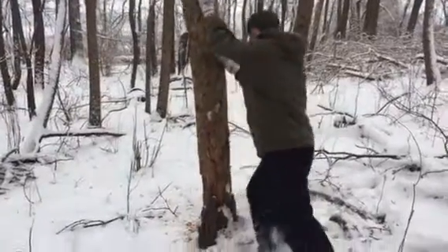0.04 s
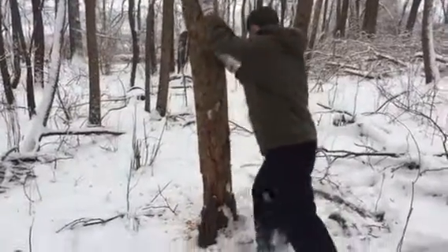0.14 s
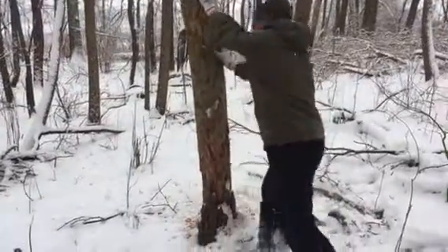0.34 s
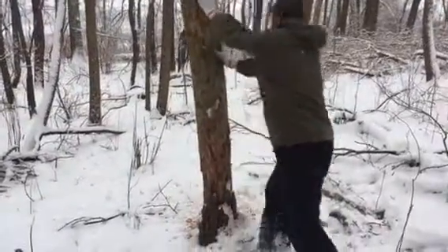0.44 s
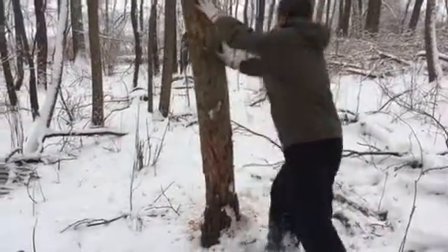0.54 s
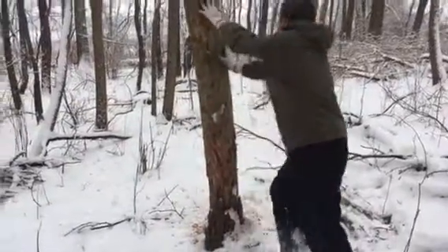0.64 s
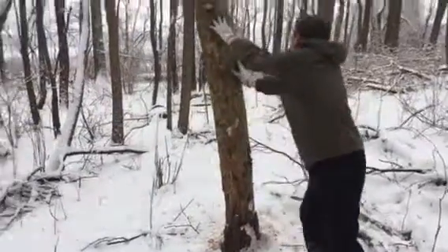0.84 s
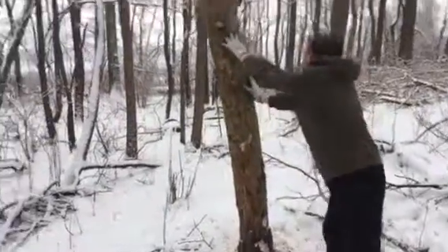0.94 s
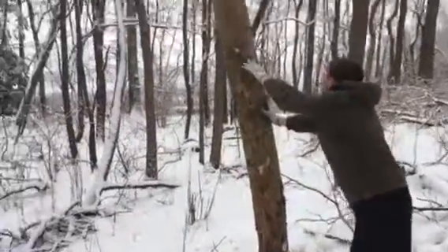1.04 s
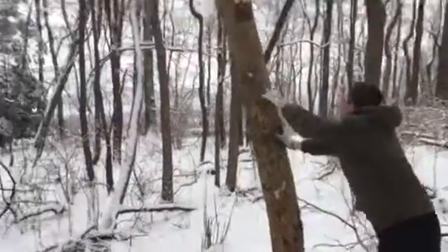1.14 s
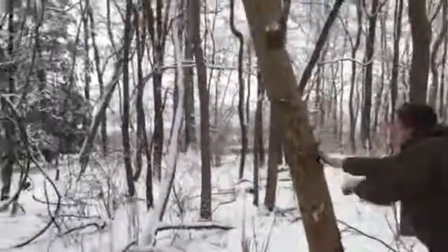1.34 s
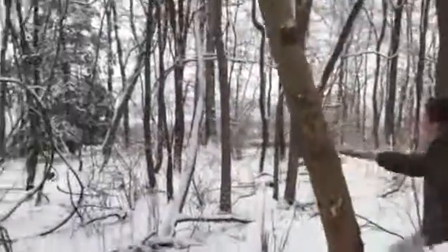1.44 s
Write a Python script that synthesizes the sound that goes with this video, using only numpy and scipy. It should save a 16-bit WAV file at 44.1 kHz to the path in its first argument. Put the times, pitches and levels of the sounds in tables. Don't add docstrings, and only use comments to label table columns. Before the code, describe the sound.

Tree trunk cracking apart in a quiet snowy wood, a few metres away. Faint air and tiny ticks until 0.2 s, then a violent cluster of cracks with a hollow thump to 0.28. A lone snap at 0.45, a second burst at 0.6-0.7, sharp breaks at 0.92-1.0 and 1.08, then smaller crackles and splintering to 1.5, over a faint low groan and short woodland scatter.

```python
import sys
import numpy as np
from scipy import signal
from scipy.fft import rfft, irfft
from scipy.io import wavfile

SR = 44100
rng = np.random.default_rng(int(sys.argv[2]) if len(sys.argv) > 2 else 0)


def amplitude_ratio(level_db):
    exponent = np.asarray(level_db, float) / 20
    return 10 ** exponent


def wav_record(signal):
    frames = np.transpose(np.atleast_2d(signal))
    bounded = np.clip(frames, -1, 1)
    quanta = np.round(bounded * 32767).astype(np.int16)
    wavfile.write(sys.argv[1], SR, quanta)


N = 66150

# hz, density_db_per_hz
FLOOR_COLOUR = [(18, -33), (30, -21), (82, -61), (455, -2), (858, -3.5), (3050, -22), (6720, -46),
                (14500, -54), (16500, -48)]
# time_s, level_db
STUMP_GROAN = [(0, -58), (.2, -63), (.3, -54), (.55, -51.5), (.85, -55.5), (1.1, -55.5), (1.5, -59)]
# time_s, level_db
FIBRE_STRAIN = [(0, -56.5), (.2, -55.5), (.3, -56), (.42, -49.5), (.58, -50), (.72, -43.5), (0.882, -59.5),
                (.98, -62), (1.04, -42.5), (1.12, -44.5), (1.19, -47), (1.242, -41), (1.3, -46), (1.5, -52)]
# hz, density_db_per_hz
SPLINTER_COLOUR = [(180, -12), (300, -4), (1250, -4.5), (2930, -10.5), (4670, -13), (9090, -13),
                   (16000, -19)]
# start_s, level_db, pitch_hz, t60_s
STAVE_RINGS = [(.091, -32.5, 683, .025), (0.09, -35.5, 593, 0.046), (.094, -38.5, 175, .1),
               (0.9, -33, 204, 0.065), (0.23, -20, 332, 0.12), (.2212, -28, 1700, .008),
               (.228, -23, 1040, 0.01), (.2425, -6, 1670, 0.0038), (.2770, -13, 2970, 0.0099),
               (.6045, -22, 720, 0.021), (.6050, -14.5, 1730, 0.012), (.6333, -13.5, 1500, 0.011),
               (.6510, -21.5, 750, 0.019), (.6985, -23.5, 1230, 0.032), (.9158, -7.5, 5340, 0.0033),
               (.9480, -29, 1230, 0.044), (.9930, -13.5, 3540, 0.0043), (.9935, -24, 700, 0.019),
               (1.0800, -15, 1340, 0.035), (1.0805, -18.5, 680, 0.023), (1.0800, -14.5, 6200, 0.0059),
               (1.2960, -26.5, 610, 0.032), (1.2965, -27, 1320, 0.013), (.384, -27.5, 1440, .01)]
# start_s, bending_wave_db, knock_db
TRUNK_THUMPS = [(0.093, -45.5, -53), (.104, -54, -47), (.222, -16, -10), (.230, -55, -10.5),
                (0.24, -24.5, -38), (0.25, -25.5, -18), (0.279, -20, -40), (0.295, -31.5, -33.5),
                (0.454, -48, -33), (0.606, -45.5, -28.5), (0.69, -23, -15.5), (.735, -47, -48),
                (0.902, -37, -68), (0.949, -55, -36), (0.991, -35, -30.5), (1.124, -34.5, -45),
                (1.150, -37.5, -58), (1.222, -47, -44), (1.296, -62, -46.5), (1.351, -47, -44.5),
                (1.40, -44, -42), (1.46, -46, -37.5)]
# pitch_hz, level_db, t60_s
TRUNK_MODES = [(263, -18, 0.066), (284, -2, 0.0377), (328.9, -0.5, 0.067), (561, -7, 0.11),
               (690, -9, 0.079)]
# start_s, woody_db, woody_hz, sharp_db, sharp_hz
FIRST_BREAK = [(0.1711, -50, 2110, -35.5, 6250), (0.1986, -39, 1070, -27.5, 3620),
               (0.2098, -35.5, 1410, -59, 3600), (0.2208, -9.5, 1800, 1, 5950),
               (0.2274, -15.5, 1320, -16, 6000), (0.2312, -14, 530, -34, 2300),
               (0.2421, -7, 1500, -9, 3140), (0.2493, -41, 1340, -5, 2500), (0.251, -15, 565, -10, 2300),
               (0.2768, -12.5, 1310, -1.5, 2970), (0.3675, -39, 2020, -51, 2630),
               (0.3838, -37, 1500, -14.5, 2650), (0.4476, -27, 1800, -4, 3030),
               (0.4602, -34, 2200, -37, 2280)]
# start_s, woody_db, woody_hz, sharp_db, sharp_hz
SECOND_BREAK = [(0.586, -55, 1870, -26, 3814), (0.5962, -38, 1500, -19.5, 5863),
                (0.6042, -43, 1620, 3.5, 6100), (0.6169, -28, 1210, -18, 2360),
                (0.633, -15.5, 1440, -2.5, 2520), (0.6479, -36, 1870, -18, 4260),
                (0.650, -19, 2080, -13, 4630), (0.6722, -34, 1400, -19, 3000),
                (0.6889, -25, 2350, -1.5, 3200), (0.6923, -13.5, 1500, -6, 2970),
                (0.6982, -17.5, 1200, -6.5, 2640), (0.7027, -22, 534, -30, 3170),
                (0.7308, -35, 1160, -16.5, 3720), (0.785, -44, 1920, -22, 2330),
                (0.8285, -31, 1400, -15.5, 3100), (0.8476, -42, 590, -23.5, 3450),
                (0.9156, -16.5, 1430, -10.5, 5460), (0.9337, -58, 1310, -20, 2350),
                (0.9461, -40, 1250, -5, 3720)]
# start_s, woody_db, woody_hz, sharp_db, sharp_hz
GIVING_WAY = [(0.9905, -21, 1470, -13, 2850), (0.993, -17, 1600, 4.5, 2870), (1.006, -33, 1940, -6.5, 2200),
              (1.027, -54, 2140, -18, 2270), (1.054, -51, 1790, -15, 3650), (1.072, -30, 2280, -8.5, 7160),
              (1.0797, -15, 954, -1, 9500), (1.1026, -47, 754, -33, 6740), (1.1118, -37, 1090, -22, 2800),
              (1.121, -43, 583, -18, 5960), (1.1323, -52, 1370, -15, 3800), (1.15, -30, 1140, -14.5, 3800),
              (1.1975, -29.5, 2370, -8.5, 2870), (1.218, -38, 1630, -19, 3640),
              (1.222, -31, 1400, -11, 7000), (1.226, -26, 1580, -12.5, 2900),
              (1.244, -51, 1400, -15.5, 3100), (1.2498, -51, 1430, -17, 3700),
              (1.2566, -30.5, 1390, -12, 4230),
              (1.279, -41, 1420, -12.5, 3520), (1.2942, -28.5, 2150, -6, 5270),
              (1.3003, -31, 1400, -19, 3840), (1.3282, -30, 1440, -31, 3040),
              (1.3391, -37, 1400, -20.5, 2630), (1.3564, -40, 1480, -24, 9600),
              (1.3937, -35.5, 1420, -23, 6100), (1.3977, -39, 2000, -17.5, 3750),
              (1.4009, -45, 690, -15, 7000), (1.4347, -37, 1280, -42, 7000),
              (1.4596, -38, 1500, -12.5, 3380), (1.4628, -30.5, 1440, -15, 2770),
              (1.47, -38, 2140, -13, 3180), (1.4894, -43, 1370, -28, 2970)]
# start_s, peak_db, fall_ms
FRAYED_FIBRES = [(0.2212, -4.5, 2), (.2275, -3.5, 1.8), (.2420, -2.5, 1.5), (.2492, -3.5, 2.1),
                 (.2762, -4.5, 1.1), (.3055, -23, 1.8), (.3200, -28, 2.2), (.4075, -32, 1.6),
                 (.6040, -1.5, 2.35), (.6120, -25, 1.7), (.6180, -21, 1.4), (0.621, -22, 1.2),
                 (0.648, -18, 1.9), (.6500, -5.5, 1.34), (0.679, -23.5, 3.6), (0.6979, -1.5, 1.7),
                 (0.7587, -40, 1.8), (.7850, -19.5, 0.92), (0.8607, -33, 1.6), (.8747, -34, 1.5),
                 (.9460, -9.5, 1.4), (0.9562, -20, 1.4), (0.975, -32, 1), (.9835, -36, 1.2),
                 (1.0050, -23, 30), (1.0725, -19, 1.3), (1.0801, -28, 1.2), (1.102, -24, 2.4),
                 (1.1365, -26, 2.2), (1.1497, -18, 2.4), (1.2855, -24, 1.5), (1.2900, -17, 1.3),
                 (1.2937, -8, 2.9), (1.3, -15.5, 2.1), (1.3200, -31, 1.5), (1.3263, -23, 1.5),
                 (1.3385, -23, 2.1), (1.3555, -21, 0.73), (1.3643, -34, 1.6), (1.3716, -25.5, 2.2),
                 (1.408, -25, 1.6), (1.4146, -32, 1.3), (1.432, -21, 2.5), (1.4436, -29, 0.94),
                 (1.479, -30, 1.8)]
# start_s, length_s, level_db, dulled_above_hz
RAGGED_TEARS = [
    (0.2227, 0.011, -12, 2160),
    (0.239, 0.019, -20.5, 3640),
    (0.689, 0.014, -21, 4050),
    (0.989, 0.011, -27.5, 5960),
]
# hz, level_db, t60_s
TREE_SCATTER = [(151, -11, 0.22), (457, -15.5, 0.24), (1400, -29, 0.71), (2980, -31.5, 0.9),
                (7000, -30.5, 0.47), (13000, -19.5, 0.086)]

FLOOR_DB = -58
SPLINTERS_PER_S, SPLINTER_SPREAD_DB, SPLINTER_DB, HISS_DB = 900, 4.0, -1, -2
BEND_LAG_S, BEND_LAW = .012, .8
BEND_LOW_HZ, BEND_HIGH_HZ = 70, 250
RISE_S, SNAP_FALL_S = .0002, .0007
WOODY_CYCLES, SHARP_CYCLES = 9.0, 12.0
BROAD_DB, BRIGHT_DB = -1, 9
CLICK = 2.5
FRAY_DB, FRAY_LOW_HZ, FRAY_HIGH_HZ = -4.5, 1500, 11100
GROUND_LAG_S, GROUND_DB, GROUND_CUT_HZ = .0026, -12.5, 5400
DIP_HZ, DIP_SHARE = 420, .5
CUTOFF_HZ = 16970


def at_hz(points, hz, column=1):
    p = np.array(points)
    return np.interp(np.log(hz), np.log(p[:, 0]), p[:, column])


def level_over_time(points):
    s, db = np.transpose(points)
    return amplitude_ratio(np.interp(np.arange(N) / SR, s, db))


def rms_one(x):
    return x / np.sqrt(np.mean(x ** 2) + 1e-20)


def peak_one(x):
    return x / (np.abs(x).max() + 1e-12)


def cut(x, hz, kind):
    return signal.sosfilt(signal.butter(2, hz, kind, fs=SR, output="sos"), x)


def colour(x, spectrum):
    hz = np.maximum(np.arange(len(x) // 2 + 1) * SR / len(x), 1)
    return rms_one(irfft(rfft(x) * amplitude_ratio(at_hz(spectrum, hz)), len(x)))


def ring(x, hz, t60):
    r = amplitude_ratio(-60 / (t60 * SR))
    w = 2 * np.pi * hz / SR
    return signal.lfilter([0, np.sin(w)], [1, -2 * r * np.cos(w), r * r], x + 1e-18)


def woodland_floor():
    return amplitude_ratio(FLOOR_DB) * cut(colour(rng.standard_normal(N), FLOOR_COLOUR), 55, "high")


def stump():
    lumps = amplitude_ratio(4.8 * rms_one(cut(rng.standard_normal(N), 3.8, "low")))
    rumble = rms_one(cut(rng.standard_normal(N), [40, 200], "band"))
    return level_over_time(STUMP_GROAN) * lumps * rumble


def splinters():
    sizes = amplitude_ratio(SPLINTER_SPREAD_DB * np.minimum(rng.exponential(1, N), 2.8))
    clicks = sizes * (rng.random(N) < SPLINTERS_PER_S / SR)
    decay = np.exp(-1 / (.0005 * SR))
    bursts = signal.lfilter([1], [1, -decay], clicks) * rng.standard_normal(N)
    grains = colour(bursts, SPLINTER_COLOUR)
    hiss = colour(rng.standard_normal(N), SPLINTER_COLOUR)
    return level_over_time(FIBRE_STRAIN) * (amplitude_ratio(SPLINTER_DB) * grains + amplitude_ratio(HISS_DB) * hiss)


def staves():
    out = np.zeros(N)
    for s, db, hz, t60 in STAVE_RINGS:
        click = amplitude_ratio(db) * (np.arange(N) == int(s * SR))
        out += ring(click, hz, t60)
    return out


def trunk():
    s, bend_db, knock_db = np.transpose(TRUNK_THUMPS)
    at = (s * SR).astype(int)
    knocks = np.zeros(N)
    chance_db = 2.0 * rng.standard_normal((len(s), len(TRUNK_MODES)))
    for k, (hz, level_db, t60) in enumerate(TRUNK_MODES):
        clicks = np.zeros(N)
        clicks[at] = amplitude_ratio(knock_db + level_db + chance_db[:, k]) * (-1) ** k
        knocks += ring(clicks, hz, t60)
    hundreds_hz = np.arange(SR // 2 + 1) / 100
    phase = 200 * np.pi * BEND_LAG_S * hundreds_hz ** (1 - BEND_LAW) / (1 - BEND_LAW)
    lagged = irfft(np.exp(-1j * phase), SR)
    wave = peak_one(cut(lagged[:SR // 5], [BEND_LOW_HZ, BEND_HIGH_HZ], "band"))
    clicks = np.zeros(N)
    clicks[at] = amplitude_ratio(bend_db)
    return cut(knocks, 1500, "low") + signal.fftconvolve(clicks, wave)[:N]


def snaps():
    rows = FIRST_BREAK + SECOND_BREAK + GIVING_WAY
    size = 1024
    out, t = np.zeros(N + size), np.arange(size) / SR
    shape = (1 - np.exp(-t / RISE_S)) * np.exp(-t / SNAP_FALL_S)
    click = 1. * (np.arange(size) == 12)
    broad = amplitude_ratio(BROAD_DB) * peak_one(cut(click, [900, 2600], "band"))
    for s, woody_db, woody_hz, sharp_db, sharp_hz in rows:
        burst = rng.standard_normal(size) * shape + CLICK * click
        bright = amplitude_ratio(BRIGHT_DB) * peak_one(cut(burst, 2500, "high"))
        woody = ring(click, woody_hz, WOODY_CYCLES / woody_hz) + broad
        sharp = ring(click, sharp_hz, SHARP_CYCLES / sharp_hz) + bright
        i = int(s * SR)
        out[i:i + size] += amplitude_ratio(woody_db + 4.64) * woody + amplitude_ratio(sharp_db - 7.5) * sharp
    return out[:N]


def frays():
    size = 4096
    out, t = np.zeros(N + size), np.arange(size) / SR
    for s, db, fall_ms in FRAYED_FIBRES:
        shape = (1 - np.exp(-t / RISE_S)) * np.exp(-1000 * t / fall_ms)
        i = int(s * SR)
        out[i:i + size] += amplitude_ratio(db + FRAY_DB) * rng.standard_normal(size) * shape
    return cut(cut(out[:N], FRAY_LOW_HZ, "high"), FRAY_HIGH_HZ, "low")


def tears():
    out, t = np.zeros(N), np.arange(N) / SR
    raggedness = amplitude_ratio(5.4 * rms_one(cut(rng.standard_normal(N), 530, "low")))
    rag = raggedness * rng.standard_normal(N)
    for s, length, db, hz in RAGGED_TEARS:
        shape = (t > s) * np.exp(-np.maximum(t - s - length, 0) / (.25 * length))
        out += amplitude_ratio(db) * shape * rms_one(cut(cut(rag, hz, "low"), 1000, "high"))
    return out


def woods(x):
    lag = int(GROUND_LAG_S * SR)
    delayed = np.r_[np.zeros(lag), x[:N - lag]]
    bounce = amplitude_ratio(GROUND_DB) * cut(delayed, GROUND_CUT_HZ, "low")
    t = np.arange(SR) / SR
    edges = 60 * 2 ** np.arange(0, 8.2, .5)
    white, tail = rng.standard_normal((2, SR)), np.zeros(SR)
    for k, (low, high) in enumerate(zip(edges, edges[1:])):
        hz = np.sqrt(low * high)
        t60 = at_hz(TREE_SCATTER, hz, column=2)
        fade = amplitude_ratio(at_hz(TREE_SCATTER, hz) - 60 * t / t60)
        tail += cut(white[k % 2], [low, high], "band") * fade
    tail *= amplitude_ratio(-20) * (1 - np.exp(-t / .003))
    return bounce + signal.fftconvolve(x, tail)[:N]


def scene():
    snapping = cut(cut(snaps(), 450, "high"), 450, "high")
    wood = staves() + trunk() + snapping + frays() + tears()
    return (woodland_floor() + stump() + splinters() + wood + woods(wood))[None]


def top_cut(x):
    return signal.sosfilt(signal.butter(12, 17000, fs=SR, output="sos"), x)


def record(dry):
    top = .8
    dip = signal.lfilter(*signal.iirpeak(DIP_HZ, 4.0, fs=SR), dry)
    dry = dry - DIP_SHARE * dip
    limited = top * np.tanh(dry / top)
    steep = signal.cheby2(12, 70, CUTOFF_HZ, fs=SR, output="sos")
    mix = signal.sosfilt(steep, limited)
    return top_cut(mix)


dry = scene()
out = record(dry)
wav_record(out)
```